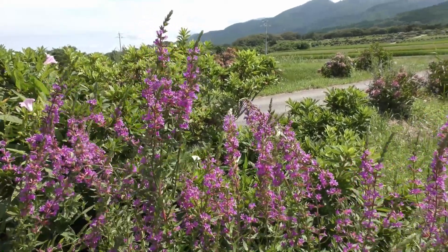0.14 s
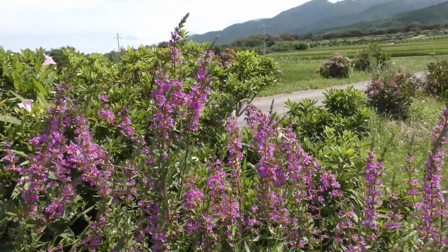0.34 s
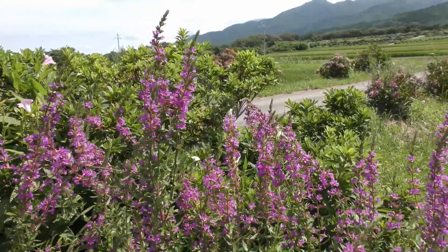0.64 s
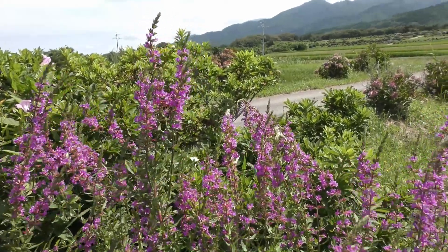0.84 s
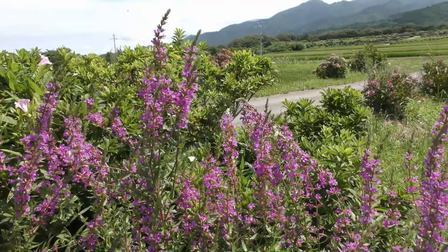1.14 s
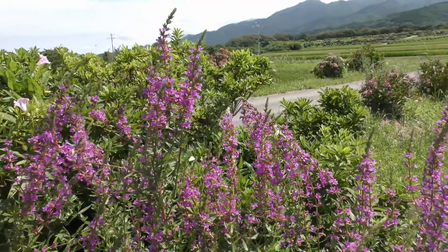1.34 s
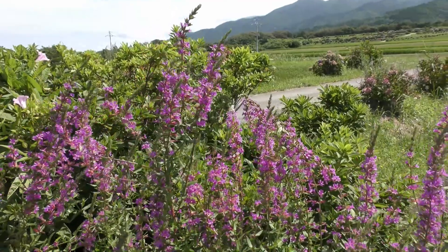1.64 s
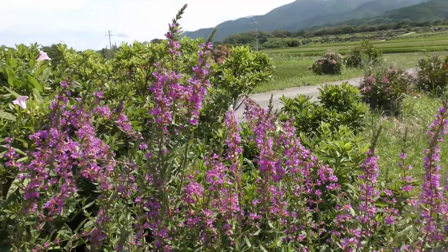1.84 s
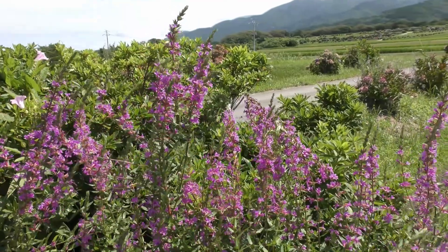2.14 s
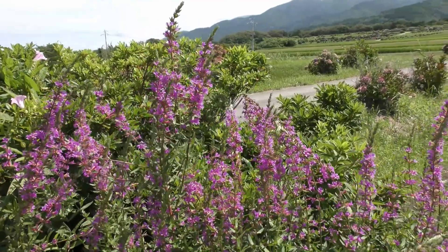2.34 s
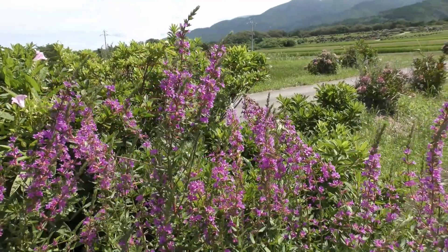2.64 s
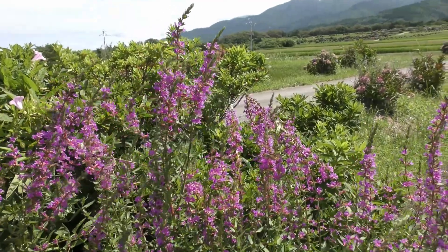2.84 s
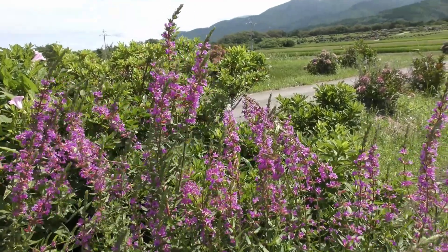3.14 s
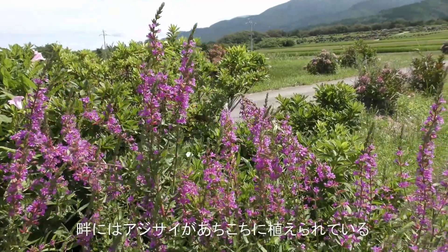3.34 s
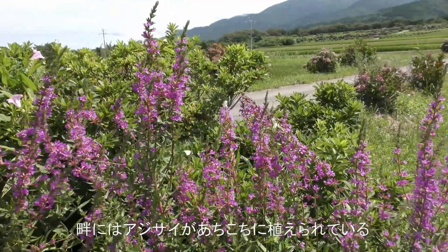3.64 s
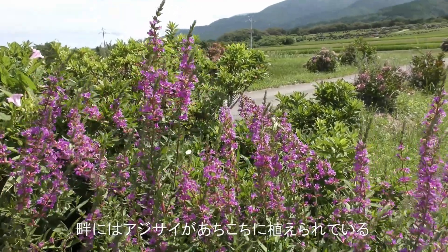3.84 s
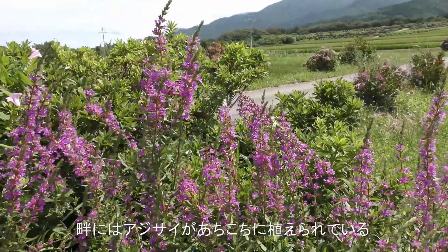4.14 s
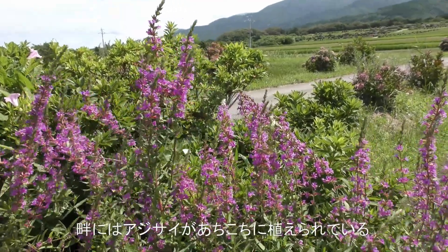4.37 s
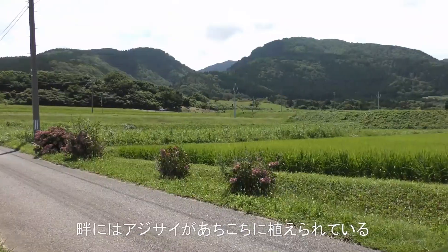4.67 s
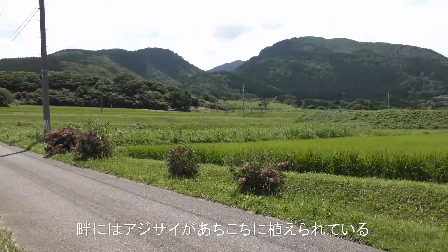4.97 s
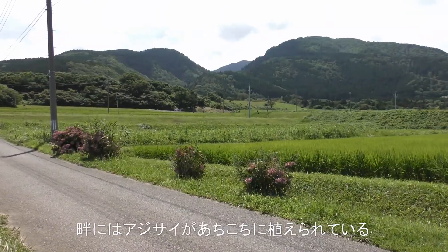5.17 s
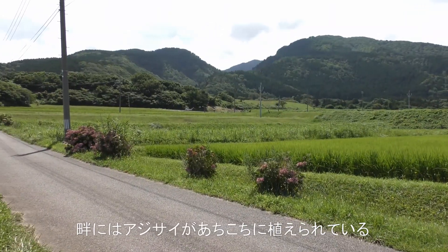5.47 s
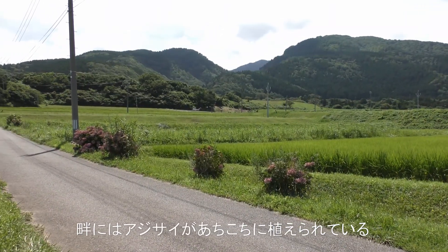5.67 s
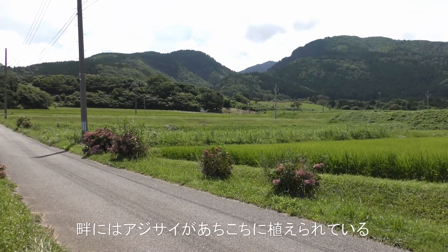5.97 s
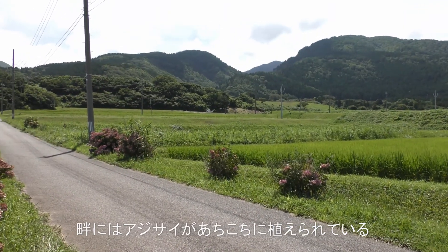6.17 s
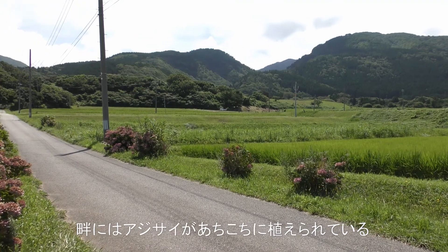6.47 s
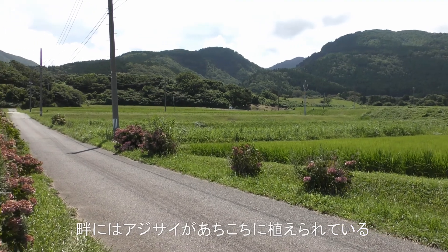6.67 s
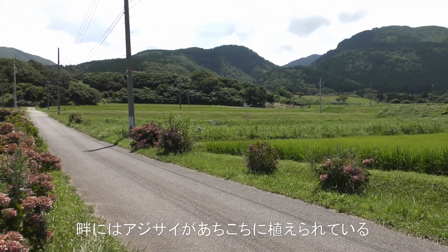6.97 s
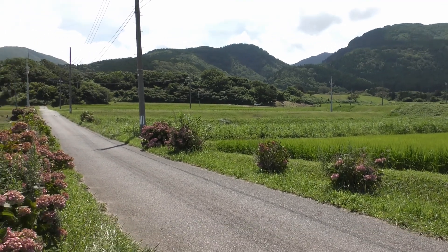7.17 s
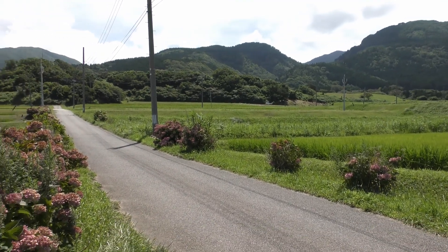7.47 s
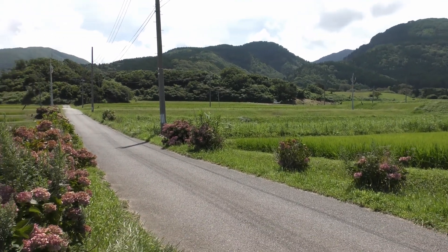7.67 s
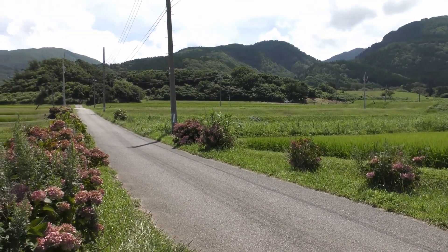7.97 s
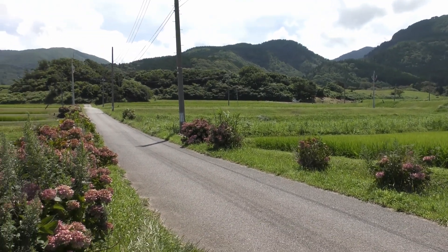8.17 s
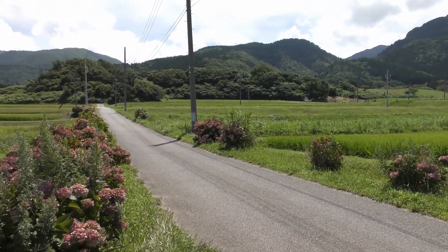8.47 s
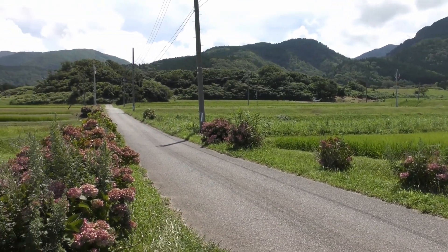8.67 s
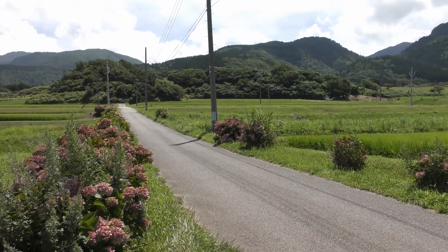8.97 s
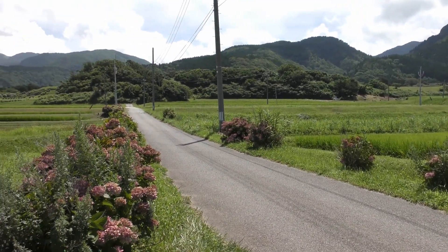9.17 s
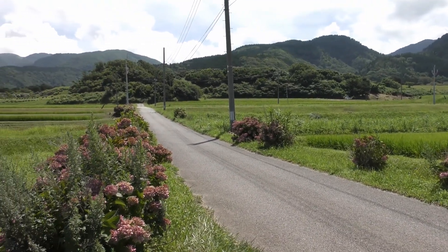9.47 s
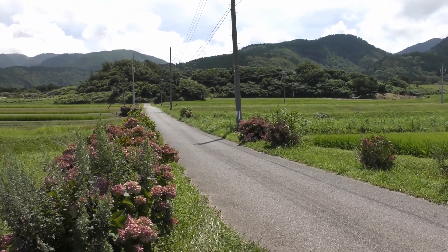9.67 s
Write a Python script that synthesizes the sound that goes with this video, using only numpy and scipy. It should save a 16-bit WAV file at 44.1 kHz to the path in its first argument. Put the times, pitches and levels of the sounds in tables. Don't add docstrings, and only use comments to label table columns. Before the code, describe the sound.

A bright, shrill cicada chorus drones from start to finish, mostly around 7 to 9 kHz, swelling only slightly over a soft hiss of air. A nearer cicada buzzes until about 4.6 s, gradually fading, while others swell around 2.8 to 4.2 s and briefly at 5 s. Deep wind gusts rumble and thump against the microphone, busiest from 0.2 to 3 s, then more scattered, with a hard thud near 6.5 s and calmer air afterward. Tiny gliding bird chirps cluster at 0 to 0.5, 4.2, 4.7 to 5.8 and 9.2 s. Faint cricket trills come at 1.1, 1.4, 4.4 and 6.6 to 7.3 s, with a clearer one at 9.6 s. Water drops plink at 6.5 to 6.9 s and from 7.9 s to the end. Momentary dropouts occur at 3.66, 4.66 and 6.66 s. Open field, almost mono, treble slightly dulled.

```python
import sys
import numpy as np
from scipy import signal
from scipy.fft import rfft, irfft, next_fast_len
from scipy.io import wavfile
from scipy.ndimage import uniform_filter1d

SR = 44100
rng = np.random.default_rng(int(sys.argv[2]) if len(sys.argv) > 2 else 0)


def invert_db(level):
    return 10 ** (np.asarray(level, dtype=float) / 20)


def output_pcm(signal):
    pcm = np.clip(np.atleast_2d(signal).T, -1, 1) * 32767
    wavfile.write(sys.argv[1], SR, np.round(pcm).astype(np.int16))


N = 432621


def evened(x):
    return x / np.sqrt(np.mean(x ** 2) + 1e-20)


def steady(x, size=6000):
    power = uniform_filter1d(x ** 2, size=size)
    return x / np.sqrt(uniform_filter1d(power, size=size))


def add(mix, s, sound):
    part = mix[round(s * SR):][:len(sound)]
    part += sound[:len(part)]


def whole(rows):
    s, *columns = np.transpose(rows)
    return [np.interp(np.arange(N) / SR, s, column) for column in columns]


def drift(rate_hz, count=12):
    t = np.arange(0, N + 512, 512) / SR
    slow = sum(np.sin(2 * np.pi * (f * t + rng.random())) for f in rate_hz * rng.random(count))
    return np.interp(np.arange(N) / SR, t, evened(slow))


def coloured(x, gain):
    size = next_fast_len(len(x), True)
    hz = np.fft.rfftfreq(size, 1 / SR) + 1
    return irfft(rfft(x, size) * gain(hz), size)[:len(x)]


def spectrum(points, hz):
    f, db = np.transpose(points)
    return invert_db(np.interp(np.log(hz), np.log(f), db))


def resonate(x, hz, width):
    turn = np.exp(2j * np.pi * np.cumsum(hz) / SR)
    r = np.exp(-np.pi * width / SR)
    return 2 * (turn * signal.lfilter([1 - r], [1, -r], x / turn)).real


def echoed(x, t60, wet_db):
    t = np.arange(6000) / SR
    tail = rng.standard_normal(len(t)) * invert_db(-60 * t / t60) * (t > .002)
    return x + invert_db(wet_db) * signal.fftconvolve(x, tail / np.linalg.norm(tail))[:len(x)]


def shimmered(x, turns):
    frame = dict(fs=SR, nperseg=1024, noverlap=768)
    hz, t, z = signal.stft(x, **frame)
    steps = uniform_filter1d(rng.standard_normal(z.shape), size=3, axis=0)
    wander = np.cumsum(turns * steps, axis=1) + 2.938 * steps[:, :1]
    return signal.istft(z * np.exp(2j * np.pi * wander), **frame)[1][:len(x)]


def swelled(length, swell, fade):
    t = np.arange(0, length, 1 / SR)
    edge_db = -6.5
    return t, edge_db * (np.clip(1 - t / swell, 0, 1) + np.clip(1 - (length - t) / fade, 0, 1))


def clicks(rate, jitter, uneven_db):
    turns = np.cumsum(rate) / SR + rng.random()
    count = np.arange(np.ceil(turns[0]), turns[-1])
    chance = rng.standard_normal((len(count), 2))
    places = np.arange(len(rate)) * (1 - 3 / len(rate))
    at = np.interp(count + jitter * chance[:, 0], turns, places)
    left, size = at.astype(int), invert_db(uneven_db * chance[:, 1])
    part = at - left
    shares = [(part - 1) * (part - 2) / 2, part * (2 - part), part * (part - 1) / 2]
    return sum(np.bincount(left + k, size * share, len(rate)) for k, share in enumerate(shares))


def crowd(count=14):
    singers = np.zeros(N)
    for rate in rng.uniform(430, 720, count):
        swell = invert_db(3.2 * drift(1.0))
        singers += swell * clicks(rate * (1 + .008 * drift(.8)), jitter=.022, uneven_db=2.5)
    return shimmered(singers, turns=.075)


# pitch_hz, density_db (per Hz)
CHORUS_TONE = [(3000, -46), (4900, -26), (5350, -17.5), (5900, -9.5), (6500, -6.5), (7100, -5.5), (7600, 0),
               (8200, 1), (8700, -2.5), (9200, -9.5), (9900, -21), (10500, -25.5), (11200, -50),
               (14000, -70)]
# low_edge_hz, high_edge_hz
CROWD_EDGES = (6940, 8900)
# time_s, middle_db, deep_db, shrill_db
CROWD_LEVELS = [(0, -34, -36.5, -40), (.45, -36, -39.5, -45), (1.7, -35, -41.5, -42.5),
                (2.1, -35.5, -42, -41.5), (3.1, -33.5, -39, -44), (3.9, -33.5, -40.5, -42.5),
                (4.62, -33, -42, -44), (4.7, -32, -45, -39.5), (5.6, -33, -44, -41.5),
                (6.3, -33, -43.5, -41), (7.4, -34, -45, -44), (8.4, -33, -46, -46), (9.2, -34.5, -43, -47),
                (9.81, -32.5, -44, -47)]


def chorus():
    middle_db, deep_db, shrill_db = whole(CROWD_LEVELS)

    def above(hz, edge):
        return (1 + np.tanh((hz - edge) / 260)) / 2

    low, high = CROWD_EDGES
    crowds = [(deep_db, lambda hz: 1 - above(hz, low)),
              (middle_db, lambda hz: above(hz, low) * (1 - above(hz, high))),
              (shrill_db, lambda hz: above(hz, high))]
    out = np.zeros(N)
    for db, share in crowds:
        singing = coloured(crowd(), lambda hz: spectrum(CHORUS_TONE, hz) * np.sqrt(share(hz)))
        out += invert_db(db + .4 * drift(6)) * steady(singing)
    return out


# start_s, length_s, level_db, click_rate_hz, belly_hz
SOLO_CALLS = [
    (0, 4.6, -40.5, 512, 8350),
    (0, 1.85, -53, 598, 5375),
    (0, .9, -48, 628, 6280),
    (2.75, 1.25, -49.5, 712, 5700),
    (2.8, 1.5, -55, 670, 5330),
    (8.33, .098, -59, 373, 4360),
    (1.8, .9, -52, 660, 5940),
    (5.02, .65, -49, 630, 6300),
    (8.435, .26, -60, 360, 4300),
]
# timing_error_periods, belly_width_hz, swell_s, fade_s, rate_change_percent
SOLO_VOICES = [(.01, 2000, .01, 2.2, .8), (.018, 270, .01, .25, -.7), (.014, 300, .01, .5, .01),
               (.01, 240, .3, .4, .01), (.02, 280, .9, .15, .01), (.004, 900, .01, .02, -.3),
               (.014, 280, .2, .3, .6), (.014, 300, .05, .4, .01), (.004, 900, .03, .15, 6)]


def solo(s, length, db, rate, belly_hz, jitter, width, swell, fade, change):
    t, shape_db = swelled(length, swell, fade)
    rate = rate * (1 + change / 100 * (t / length) ** 2)
    if width < 400:
        rate = rate * (1 + .001 * drift(3)[:len(t)])
    hz = np.full(len(t), float(belly_hz))
    ring = clicks(rate, jitter, uneven_db=2.5)
    for _ in range(2):
        ring = resonate(ring, hz, width)
    low_hz = .53 * belly_hz
    ring = coloured(ring, lambda f: 1 / ((1 + (f / 10300) ** 30) * (1 + (low_hz / f) ** 8)))
    call = evened(echoed(ring, t60=.021, wet_db=-11))
    return s, invert_db(db + shape_db) * call * signal.windows.tukey(len(t), .05)


# start_s, length_s, level_db, first_hz, last_hz
CRICKET_TRILLS = [
    (1.1, .28, -56.5, 4400, 4460),
    (1.44, .16, -58, 4430, 4410),
    (4.4, 0.24, -61, 4300, 4310),
    (6.572, .75, -59.5, 4220, 4530),
    (9.63, 0.28, -53.5, 4330, 4420),
]


def trill(s, length, db, first_hz, last_hz):
    t, shape_db = swelled(length, swell=.15, fade=.05)
    hz = first_hz + (last_hz - first_hz) * t / length
    stroke = t * 56 % 1
    shape = np.sin(np.pi * np.clip(stroke / .35, 0, 1)) ** 2
    wing_hz = hz * (1 + .3 * (.2 - np.minimum(stroke, .4)))
    tone = np.cos(2 * np.pi * np.cumsum(wing_hz) / SR)
    rasp = evened(resonate(rng.standard_normal(len(t)), hz, 600))
    return s, invert_db(db + .6 * shape_db) * evened(shape * (tone + .28 * rasp))


# start_s, length_s, level_db, first_hz, last_hz
BIRD_SLIDES = [(.1, 0.035, -48.5, 4850, 3800), (.15, .03, -49, 3730, 3050), (.303, .032, -54, 5200, 3870),
               (.348, .014, -60, 4550, 4100), (2.345, .026, -53, 4300, 3800),
               (4.735, .033, -47, 5100, 4450), (4.79, .012, -57, 4200, 4600), (5.175, .04, -64, 3900, 3200),
               (4.175, 0.032, -41.5, 4880, 3880), (5.78, .07, -61, 4650, 3700),
               (.028, .026, -57, 3570, 3820)]
# start_s, length_s, level_db, first_hz, last_hz
BIRD_SWOOPS = [(0, .032, -48, 4110, 3520), (4.208, .035, -54, 3950, 3430), (4.81, .05, -60, 3900, 3800),
               (5.13, .045, -51, 4900, 3860), (5.56, 0.047, -49, 4370, 5900), (5.655, .11, -50, 5500, 4220)]
# start_s, length_s, level_db, first_hz, top_hz
BIRD_ARCHES = [(.398, .085, -51.5, 2900, 3490), (4.242, .034, -52, 3880, 4250),
               (4.764, .034, -49, 4130, 4220), (4.858, 0.075, -46.5, 3480, 3730),
               (9.155, 0.034, -49, 5600, 5740), (9.265, .03, -59, 3980, 4100), (9.31, .03, -59, 3980, 4140),
               (.26, 0.083, -64, 2620, 2700), (.39, .07, -67, 2550, 2700), (.78, .06, -60, 2440, 2470),
               (1.22, 0.076, -61, 2510, 2580), (9.43, .12, -64, 4480, 4530)]


def chirp(s, length, db, first_hz, last_hz, bend):
    u = np.arange(0, length, 1 / SR) / length
    peak = .58
    if bend is None:
        way = np.abs(np.sin(np.pi / 2 * u / .74) ** 1.42)
    elif last_hz > first_hz:
        way = u ** bend
    else:
        way = 1 - (1 - u) ** bend
        if bend > 2:
            peak = .42
    hz = first_hz + (last_hz - first_hz) * way
    level = invert_db(db - 7 * (2 * (u - peak)) ** 2)
    tone = np.sin(2 * np.pi * np.cumsum(hz) / SR)
    return s, np.sqrt(2) * level * tone * signal.windows.tukey(len(u), .15)


# start_s, peak_db, pitch_hz, t60_s
DITCH_DRIPS = [(6.533, -46, 1700, .06), (6.598, -43.5, 1520, 0.048), (6.737, -48, 1394, .06),
               (6.812, -49, 1670, .05), (6.913, -50.5, 2060, 0.047), (7.89, -39, 1820, 0.046),
               (8.306, -46.5, 1636, .05), (8.72, -46, 2580, .03), (8.845, -44.5, 720, 0.11),
               (9.228, -41, 2500, .018), (9.39, -37, 2300, 0.024), (9.503, -45, 1760, 0.066),
               (9.742, -44, 2210, 0.044)]


def drip(s, db, hz, t60):
    t = np.arange(3000) / SR
    tick = 2 * np.exp(-t / .00022) * np.cos(2 * np.pi * 1.4 * hz * t)
    sagging_t = t + .00037 * (1 - np.exp(-t / .0017))
    ring = invert_db(-60 * t / t60) * np.sin(2 * np.pi * hz * sagging_t)
    return s, invert_db(db) * (tick + ring)


# low_hz, high_hz
WIND_BANDS = [
    (10, 47.6),
    (45, 95),
    (100, 200),
]
# time_s, strength_db, sharpness_db
WIND_BREEZE = [(0, -36, -2), (.2, -28, 1), (.75, -30, -2), (.9, -38, 5), (1.3, -32, 1.5), (1.75, -27, 1.5),
               (1.98, -37.5, 2.5), (2.4, -25, 0.5), (2.97, -26.5, 0), (3.1, -37, 0.5), (3.95, -35.5, -3),
               (4.15, -29.5, 0), (4.655, -30, -0.5), (4.67, -41.5, 1.5), (5.65, -40, 4), (6.3, -30, 2),
               (7.5, -44, 1), (9.81, -50.5, 3)]
# time_s, over_breeze_db, sharpness_db
WIND_EDDIES = [(.25, 0.5, 4), (.43, 2.5, -3), (.54, 3.5, 3), (.65, 0.5, 5), (1.0, 7, 0), (1.3, 8, -1),
               (1.47, 3.5, -3), (1.69, 4, 0), (1.9, 6, 1.5), (2.07, 8, -0.5), (2.35, 0, 3), (2.51, 4.5, 1),
               (2.63, 0, 2), (2.73, 3, -1), (2.89, 5, -8), (3.64, -1, 2), (3.82, 5, -4), (4.11, 2, 0),
               (4.3, 2, 4), (4.43, 4, 4), (4.95, 9, 1), (5.12, 5.5, 6), (5.48, 5, -11), (6.17, -5, 6),
               (6.46, 10, -8), (6.72, 2, 3), (7.22, 5, 6), (7.76, 3, 6), (9.05, 7, -4), (9.74, 6.5, 8)]
# middling_level_db, breeze_share, eddy_share, sharpness_share
WIND_FOLLOW = [
    (-34, 0.95, 1.18, .01),
    (-41.5, 0.97, 0.64, .8),
    (-51.5, .45, 0.17, .9),
    (-67, 0.5, .3, 1.5),
]
# start_s, level_db, length_s
PRESSURE_PUSH = (3.648, -27, .0152)


def wind():
    breeze_db, sharp_db = whole(WIND_BREEZE)
    eddy_db = np.zeros(N)
    eddy_s = .025
    lump = np.exp(-np.linspace(-3, 3, round(6 * eddy_s * SR)) ** 2 / 2)
    for s, db, sharp in WIND_EDDIES:
        add(sharp_db, s - 3 * eddy_s, sharp * lump)
        add(eddy_db, s - 3 * eddy_s, db * lump)
    over_db = breeze_db + 35
    *levels, flutter_db = [db + breeze * over_db + eddy * eddy_db + sharp * sharp_db
                           for db, breeze, eddy, sharp in WIND_FOLLOW]
    out = np.zeros(N)
    for db, (lo, hi) in zip(levels, WIND_BANDS):
        band = lambda hz: hz ** -.9 / np.sqrt((1 + (lo / hz) ** 6) * (1 + (hz / hi) ** 6))
        noise = steady(coloured(rng.standard_normal(N), band), size=2500)
        out += invert_db(db + 2.37 * drift(9, count=30)) * noise
    flutter = lambda hz: hz ** -1.2 / np.sqrt(1 + (230 / hz) ** 6)
    out += invert_db(flutter_db) * evened(coloured(rng.standard_normal(N), flutter))
    s, db, length = PRESSURE_PUSH
    add(out, s, -invert_db(db) * np.sin(np.linspace(0, np.pi / 2, round(length * SR))) ** 2)
    return .2 * np.tanh(out / .2)


# pitch_hz, density_db (per Hz)
AIR_TONE = [(30, -6.5), (150, -5), (300, -4.5), (500, -7.5), (900, -8), (1500, -12), (2200, -13.5),
            (3200, -14.5), (4500, -14.5), (9000, -16), (12000, -19), (16000, -21)]


def air():
    hiss = coloured(rng.standard_normal(N), lambda hz: spectrum(AIR_TONE, hz))
    return invert_db(-48.5 + .5 * drift(3)) * evened(hiss)


# pitch_hz, level_db
PORT_TONE = [(200, -46), (500, -35), (1200, -34), (4500, -33.5), (5600, -30), (6600, -24), (7200, -29),
             (8000, -25), (8700, -44), (11500, -30), (16000, -36)]
# time_s, width_db
PORT_WIDTH = [(0, 4.5), (2, 3), (4.4, 0.5), (5, 0.5), (6.5, 3), (7.2, -5), (9.81, -6.5)]


def port_difference(field):
    scattered = shimmered(field, turns=.106) - .5 * field
    width = invert_db(whole(PORT_WIDTH)[0] + 7.2 * drift(9, count=30))
    side = width * coloured(scattered, lambda hz: spectrum(PORT_TONE, hz))
    return side + invert_db(-71) * evened(coloured(rng.standard_normal(N), lambda hz: hz > 13000))


def scene():
    near, birds = np.zeros(N), np.zeros(N)
    for call, voice in zip(SOLO_CALLS, SOLO_VOICES):
        add(near, *solo(*call, *voice))
    for row in CRICKET_TRILLS:
        add(near, *trill(*row))
    for rows, bend in [(BIRD_SLIDES, 1.05), (BIRD_SWOOPS, 2.5), (BIRD_ARCHES, None)]:
        for row in rows:
            add(birds, *chirp(*row, bend))
    for row in DITCH_DRIPS:
        add(birds, *drip(*row))
    field = chorus() + near + air() + echoed(birds, t60=.1, wet_db=-7.5)
    side = port_difference(field)
    return field + wind() * [[1.005], [.998]] + side * [[1], [-1]]


def thinned(dry):
    frame = dict(fs=SR, window="cosine", nperseg=2048, noverlap=1024)
    hz, _, z = signal.stft(dry, boundary="zeros", **frame)
    hz = hz[:, None]
    power = abs(z.mean(0)) ** 2
    load_db = 10 * np.log10(power.sum(0) / np.median(power.sum(0)))
    luck_db = 3.5 * evened(uniform_filter1d(rng.standard_normal(power.shape), size=32, axis=0))
    tilt_db = 1.4 * np.minimum(hz - 14000, 0) / 1000 + 2.5 - 9 * np.exp(-(hz - 10300) / 700)
    step_db = .5 * load_db + luck_db + tilt_db
    usual = uniform_filter1d(power.mean(1), size=32)[:, None]
    lost = (power < usual * invert_db(2 * step_db)) * (hz > 10000)
    return signal.istft(z * (1 - lost), **frame)[1][:, :N]


SPLIT_TIMES = [.2, .34, .8, .97, 1.0, 1.179, 1.32, 1.5, 1.7, 1.77, 2.5, 2.98, 3.58, 3.93, 4.23, 5.59, 6.04,
               7.04, 7.2, 8.16, 9.6, 9.66]


def split_error(dry):
    split = np.zeros(N)
    for s in SPLIT_TIMES:
        add(split, s - .02, np.hanning(1800))
    tone = lambda hz: invert_db(-10.5 - 11 * np.exp(-((hz - 8300) / 2400) ** 2)) * (hz > 250)
    return split * coloured(shimmered(dry.mean(0), turns=.3), tone) * [[1], [-1]]


# time_s, fade_out_s, fade_in_s
SCENE_CHANGES = [
    (3.6628, .0002, .011),
    (4.6635, .004, .006),
    (6.6628, .0015, .011),
]


def join_gain():
    t, gain = np.arange(N) / SR, np.ones(N)
    for s, fade_out, fade_in in SCENE_CHANGES:
        gain *= np.clip(np.maximum((s - t) / fade_out, (t - s) / fade_in), 0, 1)
    return gain


def top_cut(x):
    return signal.sosfilt(signal.butter(12, 15810, fs=SR, output="sos"), x)


def record(dry):
    mix = (thinned(dry) + split_error(dry)) * join_gain()
    return top_cut(mix)


dry = scene()
out = record(dry)
output_pcm(out)
```